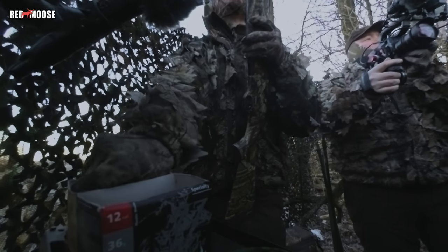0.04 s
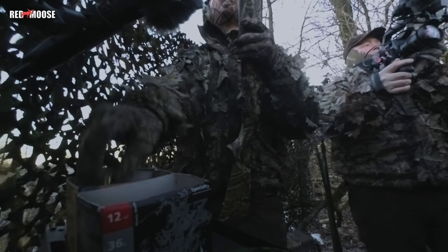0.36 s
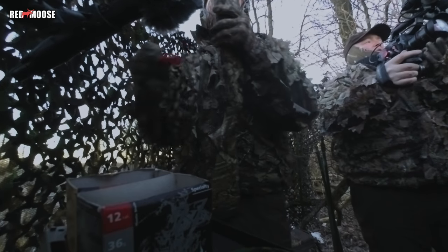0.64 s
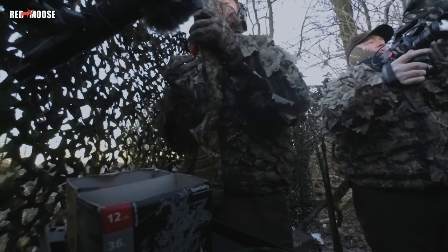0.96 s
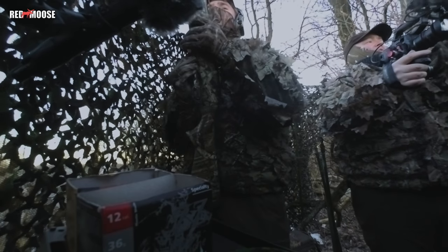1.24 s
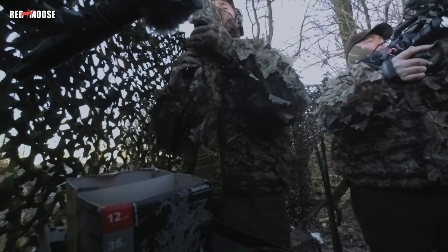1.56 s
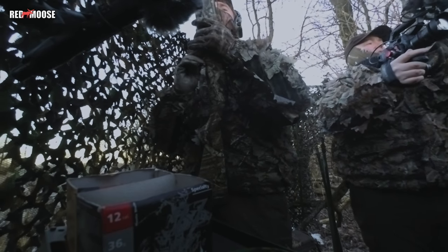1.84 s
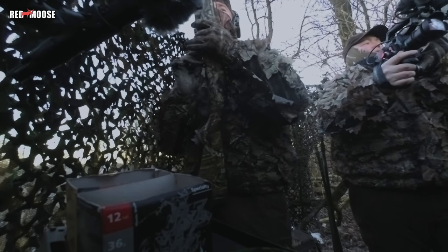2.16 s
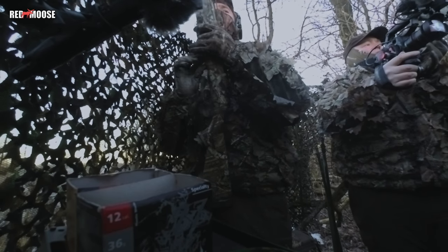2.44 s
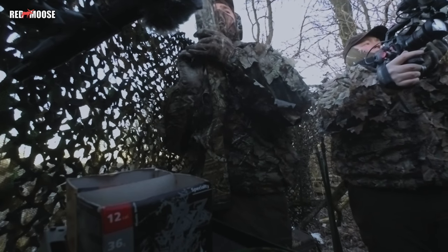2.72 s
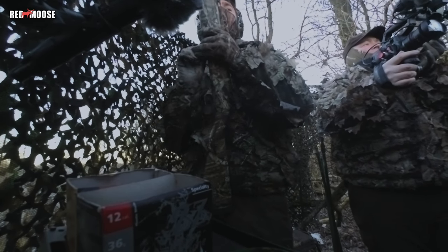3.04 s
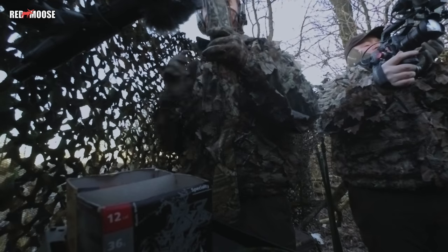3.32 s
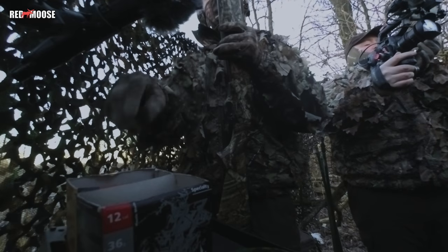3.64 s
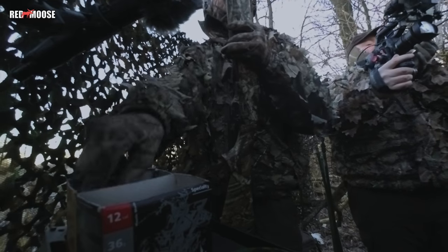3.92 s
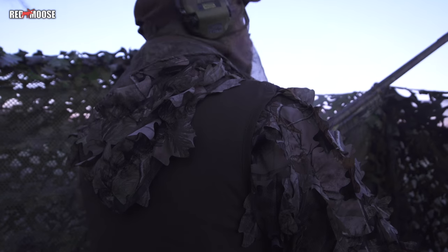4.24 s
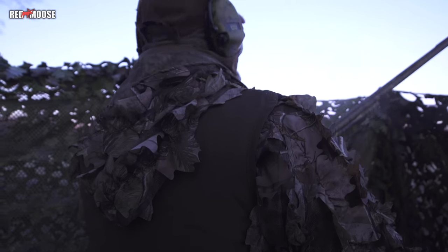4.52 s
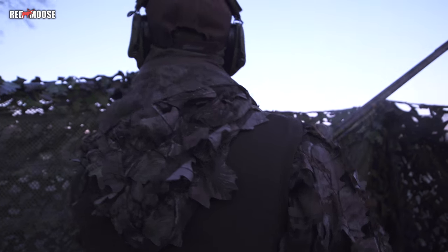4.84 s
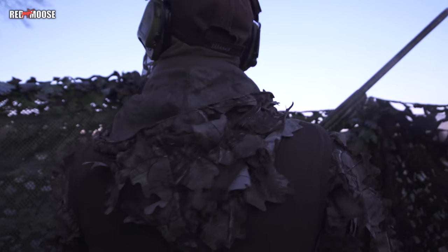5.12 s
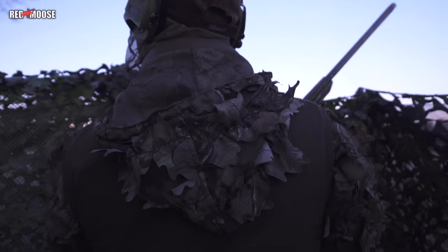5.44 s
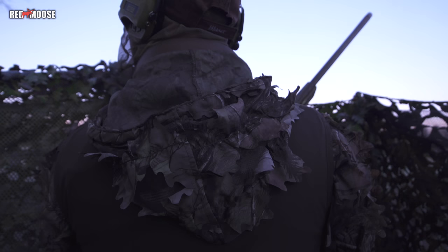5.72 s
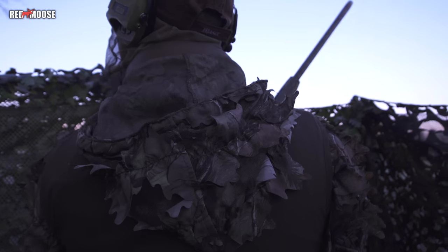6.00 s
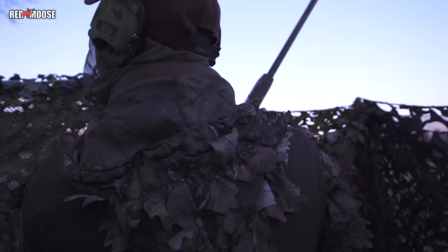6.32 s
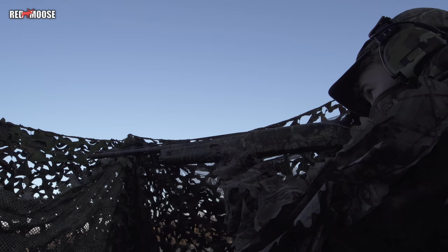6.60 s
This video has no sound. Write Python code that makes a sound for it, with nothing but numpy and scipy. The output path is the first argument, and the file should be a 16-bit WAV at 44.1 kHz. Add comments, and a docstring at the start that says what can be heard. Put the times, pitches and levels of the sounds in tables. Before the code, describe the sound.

A hand knocks softly against a cardboard cartridge box while a leafy camouflage suit rustles and a low rumble swells briefly. Cartridges click and slide into a shotgun, and its steel action snaps twice, the second time louder. Quiet woodland air with a faint hum then gives way to stiller open air, where the gear keeps clicking and tapping lightly. Everything sounds close.

```python
"""A shotgun is loaded in a hunting blind: cartridges click and slide in, and the steel action snaps twice. A
gloved hand bumps the cardboard cartridge box, and a leafy camouflage suit rustles as the arms move. A few low
rumbles swell and die. Behind it all are woodland air and a faint hum; at about four seconds the scene changes,
and the background becomes quieter open air without the hum."""
import sys
import numpy as np
from scipy import signal
from scipy.fft import rfft, irfft
from scipy.io import wavfile

SR = 44100
rng = np.random.default_rng(int(sys.argv[2]) if len(sys.argv) > 2 else 0)


def transcribe(u):
    """Save the signal u as a 16-bit wav file named by the first command-line argument.

    u: samples, shape (n,) or (channels, n), limited to [-1, 1]; the rate is SR.
    q: integer samples, one column per channel.
    """
    v = np.clip(np.atleast_2d(u).T, -1, 1)
    q = np.round(v * 32767).astype(np.int16)
    wavfile.write(sys.argv[1], SR, q)


N = 298116
TIME = np.arange(N) / SR
AGE = TIME[:SR // 8]  # seconds since one short sound began
QUIET_S = 4.12  # when the scene changes to a quieter background


# Ringing tones of the gun's catch and of its breech, where the cartridges go in:
# (pitch [Hz], level relative to the snap [dB], time to fade by 60 dB [s])
CATCH_TONES = [(380, -28, 0.017), (1781, -15, 0.017), (3415, -10, .018), (4020, -9.5, 0.014),
               (4800, -3.5, 0.0084), (5200, 1.5, 0.009), (6080, -9, .018), (7230, -4, 0.0098),
               (8160, -7, .015), (12420, -5.5, 0.0066), (13650, -7.5, .01)]
BREECH_TONES = [(350, -29.5, 0.015), (530, -16, .018), (756, -10, 0.011), (1230, -4, 0.014),
                (1796, -1, .013), (2670, -8.5, 0.01), (4170, -11.5, .011), (4850, -6.5, 0.0067),
                (5410, -11, 0.0086), (6250, -15, 0.008), (8215, -1, 0.005), (13600, -17.5, .01)]

def snap(tones, start_s, level_db, hold_s):
    """Sprung steel slams home: it stays loud for an instant, then rings out, damped by the hands."""
    out = np.zeros(N)
    for hz, db, t60 in tones:
        tone = np.sin(2 * np.pi * (hz * AGE + rng.random()))
        add(out, start_s, undb(level_db + db) * tone * fade(t60, hold_s))
    return out


# Small hard hits of cartridges, gun and gear:
# (time [s], level [dB], decay time [s], centre pitch [Hz], width [octaves], the part's own ring [Hz])
CLICKS = [(.2646, -44, .0027, 12000, 1.9, 8500), (0.41, -46, 0.003, 1600, 1, 1900),
          (.424, -38.5, 0.0075, 1900, 1.24, 1160), (0.474, -37, .0035, 690, 2.36, 1080),
          (.501, -48.5, .004, 1700, 1.7, 1590), (.888, -54, .0026, 3200, 1.5, 3480),
          (1.206, -52.5, .0032, 5340, 0.83, 6420), (1.223, -52, 0.0038, 1470, 1.4, 1440),
          (1.2517, -44, 0.0017, 2400, 1.23, 3000), (1.36, -36, 0.0011, 3740, 1.27, 3700),
          (1.381, -35.5, 0.0029, 2800, 1.6, 4210), (1.3879, -37, 0.0042, 2700, 1.9, 3470),
          (1.425, -39.5, 0.0016, 5400, 3.2, 4550), (1.512, -53, .0018, 2400, 1.6, 4900),
          (1.687, -56.5, .0058, 1200, 2.2, 2050), (2.2589, -37.5, 0.0016, 1600, 1.3, 3520),
          (2.2633, -31.5, 0.0014, 6700, 3.8, 4620), (2.8289, -39.5, 0.001, 3980, 1.47, 4350),
          (2.864, -44, 0.0037, 1200, 2.3, 1170), (2.8695, -22.5, 0.0013, 5800, 2.8, 1408),
          (2.879, -43, .002, 4700, 3.2, 3254), (3.0375, -45, 0.0049, 1290, 1.2, 1200),
          (3.059, -53.5, .0046, 1690, 2, 1400), (3.2776, -45, 0.0043, 1393, 2.27, 1780),
          (4.4151, -42, 0.0054, 2330, 1.47, 1703), (4.437, -47, 0.0024, 1580, 1.2, 1710),
          (4.502, -52, 0.0037, 1880, 2.8, 1600), (4.619, -40, 0.0011, 1680, 1.3, 1740),
          (4.633, -48, .0057, 2400, 1.3, 1730), (4.6423, -45.5, .0021, 3600, 2.2, 4660),
          (4.651, -32, 0.0022, 3250, 2.9, 1676), (4.846, -49.5, .0022, 1480, 2.6, 3300),
          (4.859, -58, 0.0042, 4320, 1.4, 5240), (4.879, -49.5, 0.0056, 2300, 1.4, 3450),
          (4.886, -44, 0.0049, 800, 2.1, 684), (4.9624, -58.5, 0.0038, 1510, 2.4, 1580),
          (5.2043, -63.5, .005, 4500, 1.4, 4350), (5.3514, -54, 0.0041, 4800, 2.2, 5720),
          (5.5445, -49, 0.0035, 3300, 1.37, 4180), (5.6215, -49.5, 0.0049, 3200, 1.3, 4100),
          (5.6354, -31, 0.0049, 3440, 2.63, 1132), (5.6852, -43, 0.0064, 1590, 2.3, 1740),
          (5.8542, -47, 0.0021, 3400, 3.2, 1610), (6.028, -52.5, 0.0054, 2100, 1.3, 1800),
          (6.3233, -48, 0.0021, 3400, 1.94, 1554), (6.4224, -56, .0025, 1907, 1.23, 1860),
          (6.555, -46.5, 0.0021, 990, 2.2, 1410), (6.6538, -52, 0.0029, 2280, 3.6, 1830)]
# The low, middle, high and top ranges of the gear's sound: (from [Hz], to [Hz])
GEAR_BANDS = [(450, 1100), (1150, 2600), (2900, 6300), (6800, 13000)]
# The gun rings along with every click: (pitch [Hz], level relative to the click [dB])
GUN_RINGS = [(1720, -10), (4400, -12.5)]

def clicks(hold=0.31, rise_s=0.0003, scuff_db=-22, scuff_s=0.0035, tail_db=-21, ring_db=-2.5, crack_db=-2):
    """Hard parts graze, then hit: a noisy crack, with the part and the gun ringing above it."""
    times, level_db, decay_s, centre_hz, width, ring_hz = np.transpose(CLICKS)[:, :, None]
    lead = SR // 100  # a faint scuff grows over the 10 ms before each hit
    scuff = undb(scuff_db) * np.exp(-AGE[lead:0:-1] / scuff_s) * np.ones_like(times)
    blow = fade(np.log(1000) * decay_s, hold * decay_s) * (1 - np.exp(-AGE / rise_s))
    loudness = np.hstack([scuff, blow + undb(tail_db) * fade(t60=0.058)])  # one row per click
    crack = rng.standard_normal(loudness.shape) * loudness
    levels = band_levels(level_db + crack_db, centre_hz, width)
    sounds = sum(undb(db) * same_energy(band(crack, edges, order=3))
                 for edges, db in zip(GEAR_BANDS, levels))
    for hz, db in [(ring_hz, ring_db)] + GUN_RINGS:
        ring = np.sin(2 * np.pi * (hz * AGE + rng.random(times.shape))) * blow
        sounds[:, lead:] += undb(level_at(hz, level_db + db, centre_hz, width)) * same_energy(ring)
    out = np.zeros(N)
    for hit_s, sound in zip(times[:, 0], sounds):
        add(out, hit_s - lead / SR, sound)
    return out


# Cartridges, fittings and straps sliding:
# (start [s], end [s], level [dB], centre pitch [Hz], width [octaves])
SLIDES = [(2.576, 2.591, -54.5, 2500, 2.7), (2.666, 2.682, -50, 2000, 2.7), (2.682, 2.752, -43, 2800, 2.04),
          (2.746, 2.771, -38.5, 2320, 1.85), (2.797, 2.821, -48.5, 6500, 2.8),
          (2.842, 2.855, -54, 6000, 2.2), (4.394, 4.41, -57, 1700, 0.98), (4.482, 4.495, -49, 5000, 2.1),
          (4.538, 4.618, -56.5, 2680, 1.7), (4.837, 4.842, -53, 1400, 1.9), (5.374, 5.492, -61, 3570, 1.9),
          (5.68, 5.683, -50.5, 1400, 1.8), (5.84, 5.861, -60, 1400, 2.5), (6.316, 6.321, -58, 2400, 2.3),
          (6.525, 6.553, -52, 1600, 1.47)]
# Pitches that the gun's steel tube strengthens: (pitch [Hz], width [Hz], level [dB])
TUBE_TONES = [(790, 250, -13.5), (1780, 350, 3), (4100, 1500, 5), (8500, 810, 7)]

def slides(edge_s=0.009, judder_db=1.8):
    """Plastic and brass scrape along a steel tube in tiny uneven slips."""
    slips = grains(spread_db=1) * undb(judder_db * wander(200))
    tube = sum(undb(db) * band(slips, (hz - width / 2, hz + width / 2), order=1)
               for hz, width, db in TUBE_TONES)
    bands = np.array([unit(band(slips + tube, edges, order=3)) for edges in GEAR_BANDS])
    out = np.zeros(N)
    for start_s, end_s, *contact in SLIDES:
        pressure = np.clip(np.minimum(AGE, end_s - start_s + edge_s - AGE) / edge_s, 0, 1)
        i = int(start_s * SR)
        scrape = undb(band_levels(*contact)) @ bands[:, i:i + len(AGE)]
        add(out, start_s - edge_s / 2, pressure * scrape)
    return out


# The hand bumps the box: (time [s], level [dB], favoured pitch [Hz], time to fade by 60 dB [s])
BOX_KNOCKS = [(0.206, -33, 670, 0.034), (.371, -26.5, 587, 0.026), (0.4118, -20.5, 580, 0.027),
              (.4243, -19.5, 786, 0.048), (0.4761, -18, 350, 0.034), (.489, -27.5, 340, 0.04),
              (0.502, -26.5, 370, 0.025), (.511, -31.5, 794, 0.031), (3.915, -25, 474, 0.023),
              (3.938, -29.5, 630, 0.022), (4.073, -33.5, 790, .03), (4.106, -33.5, 620, 0.034)]
# Tones of the cardboard panels: (pitch [Hz], level [dB])
PANEL_TONES = [(285, -28), (345, -4), (500, -4), (595, 3), (755, 3), (841, 2.5), (950, 7.5), (1900, -14)]

def box_knocks(reach_octaves=0.14, rise_s=0.00064):
    """Soft blows on cardboard; where each one lands decides which panels ring most."""
    out = np.zeros(N)
    panel_hz, panel_db = np.transpose(PANEL_TONES)
    for start_s, db, favoured_hz, t60 in BOX_KNOCKS:
        share = undb(panel_db) / (1 + (np.log2(panel_hz / favoured_hz) / reach_octaves) ** 2)
        detuned_hz = panel_hz * (1 + 0.01 * rng.standard_normal(len(panel_hz)))
        ring = share @ np.sin(2 * np.pi * np.outer(detuned_hz, AGE)) / np.linalg.norm(share)
        add(out, start_s, undb(db) * ring * fade(t60) * (1 - np.exp(-AGE / rise_s)))
    return out


# Arms and shoulders moving in the suit:
# (peak time [s], rise [s], fall [s], crinkle level [dB], brushing relative to crinkle [dB])
ARM_MOVES = [(.02, 0.11, 0.29, -59.5, -1), (0.201, 0.037, 0.022, -51, 0), (0.373, 0.13, 0.026, -45, 1),
             (.45, 0.03, 0.034, -50, 6), (.68, 0.21, 0.18, -57, -3), (1.03, 0.12, 0.12, -58, -5),
             (1.42, 0.17, 0.16, -61.5, -4), (1.8, 0.14, .05, -66, -8), (2.25, 0.017, .02, -49.5, -8),
             (2.8, 0.13, 0.12, -61.5, -1.5), (3.45, 0.88, 0.16, -64.5, -7), (3.96, 0.13, .12, -59.5, 2.5),
             (4.104, 0.061, .04, -44, 1.5), (4.46, .15, 0.09, -65, -8), (4.607, 0.033, 0.058, -52.5, -9.5),
             (4.93, 0.35, 0.23, -64, -7), (5.43, .05, 0.068, -63, -15), (5.665, .02, 0.057, -59.5, -2),
             (6.02, .1, 0.069, -81, 4), (6.52, 0.19, .12, -71, -4.5)]
# Tone colours of the brushing fabric and the crinkling leaves: (pitch [Hz], level [dB])
BRUSH_COLOUR = [(110, -19.5), (190, -2.5), (300, -3.5), (420, -7.5), (550, 1.5), (800, 0.5), (1100, -5),
                (1800, -21.5)]
CRINKLE_COLOUR = [(600, -15), (1200, -2), (1800, 3.5), (2400, -2), (5000, -4.5), (9000, -6), (11000, -14),
                  (15000, -17.5)]

def leaf_suit(flutter_db=1.8, brush_db=1.5, still_db=-76, tick_db=-17, ticks_per_s=14):
    """Each movement makes the fabric brush dully while its stiff leaves crinkle and now and then tick."""
    brush_gain, crinkle_gain = 0, undb(still_db)
    for *timing, db, rub_db in ARM_MOVES:
        speed = undb(db) * swell(*timing)
        brush_gain = np.hypot(brush_gain, undb(rub_db) * speed)
        crinkle_gain = np.hypot(crinkle_gain, speed)
    fabric = colour(grains(spread_db=1.8), BRUSH_COLOUR)
    leaves = colour(grains(spread_db=2.1), CRINKLE_COLOUR)
    flutter = undb(flutter_db * wander(70))
    tick_starts = 1.0 * (rng.random(N) < ticks_per_s / SR)
    flicks = signal.oaconvolve(tick_starts, fade(t60=0.012))[:N]
    ticks = undb(tick_db) * unit(band(flicks * rng.standard_normal(N), (1500, 12000)))
    return flutter * (undb(brush_db) * brush_gain * fabric + crinkle_gain * (leaves + ticks))


# A microphone mount sways when the box is touched: (peak time [s], rise [s], fall [s], level [dB])
MOUNT_SWAYS = [(.03, 0.24, 0.23, -49), (.45, 0.13, .17, -38), (3.92, .025, 0.065, -42),
               (4.105, 0.042, 0.034, -35)]
# Other short low rumbles: (peak time [s], rise [s], fall [s], level [dB])
RUMBLES = [(4.11, 0.049, .03, -48), (5.67, .11, .045, -46), (5.905, 0.13, 0.065, -47)]
# Tone colours of the sway and of the rumbles: (pitch [Hz], level [dB])
SWAY_COLOUR = [(18, -29), (25, 0.5), (32, 2), (36, -6), (42, -3), (60, -26), (120, -23), (250, -38.5)]
RUMBLE_COLOUR = [(40, -27), (65, 7), (100, 2.5), (150, -3.5), (210, -0.5), (300, -13), (420, -21),
                 (700, -50)]

def rumble(swells, tone_colour):
    """Deep noise swells and dies away, as when the mount wobbles."""
    loudness = sum(undb(db) * swell(*timing) for *timing, db in swells)
    return loudness * colour(rng.standard_normal(N), tone_colour)


def hum(pitch_hz=59.7, waver=0.00493, harmonics_db=(-66.5, -66, -71, -71.5, -75.5, -74.5, -77)):
    """A faint, slightly wavering hum: a low tone plus tones at whole multiples of its pitch."""
    cycles = np.cumsum(pitch_hz * (1 + waver * wander(5))) / SR
    return sum(np.sqrt(2) * undb(db) * np.cos(2 * np.pi * multiple * cycles)
               for multiple, db in enumerate(harmonics_db, start=1))


# Tone colours of woodland air and of stiller open air: (pitch [Hz], level [dB])
WOODLAND_COLOUR = [(25, -4.5), (90, -6.5), (150, -14.5), (330, -14), (1000, -11.5), (1300, -16.5),
                   (1700, -23), (2500, -25), (4500, -29.5), (7000, -29), (15000, -35)]
OPEN_AIR_COLOUR = [(25, -5), (50, -7.5), (80, 3), (140, -13.5), (300, -9), (500, -3.5), (1100, -6),
                   (1600, -5), (2300, -13), (5000, -20), (10000, -21.5), (15000, -24.5)]

def outdoor_air(woodland_db=-58.5, open_db=-64.5, drift_db=-1.4):
    """Woodland air with the hum, then stiller open air; the loudness drifts gently."""
    woodland = hum() + undb(woodland_db) * colour(rng.standard_normal(N), WOODLAND_COLOUR)
    open_air = undb(open_db) * colour(rng.standard_normal(N), OPEN_AIR_COLOUR)
    return np.where(TIME < QUIET_S, woodland, open_air) * undb(drift_db * wander(3))


def echoes(level_db, t60, edges_hz, rise_s=0.0016):
    """The echoes of one sharp click, so many that they blur into fading noise."""
    tail = band(rng.standard_normal(len(AGE)), edges_hz) * fade(t60) * np.minimum(AGE / rise_s, 1)
    return undb(level_db) * tail / np.linalg.norm(tail)


def undb(db):
    """Turn decibels into a number to multiply by."""
    return 10 ** (np.asarray(db) / 20)


def unit(x):
    """Scale to an average (rms) level of 1."""
    return x / np.sqrt(np.mean(x ** 2))


def same_energy(rows):
    """Give each row the energy of a sound of level 1 lasting 10 ms."""
    return rows / np.sqrt(np.sum(rows ** 2, axis=1, keepdims=True) / (SR // 100))


def add(out, start_s, sound):
    """Mix a sound in at its start time."""
    i = int(start_s * SR)
    out[i:i + len(sound)] += sound[:N - i]


def band(x, edges_hz, order=2):
    """Keep the pitches between two edges."""
    return signal.sosfilt(signal.butter(order, edges_hz, "band", fs=SR, output="sos"), x)


def colour(x, points):
    """Shape the bass and treble along a (pitch, level) curve that falls away past its ends; rms 1."""
    hz, db = np.transpose(points)
    log_hz = np.log(np.maximum(np.arange(N // 2 + 1) * SR / N, 1))
    beyond = np.abs(log_hz - np.clip(log_hz, np.log(hz[0]), np.log(hz[-1])))
    curve_db = np.interp(log_hz, np.log(hz), db) - 20 * beyond
    return unit(irfft(rfft(x) * undb(curve_db), N))


def level_at(hz, level_db, centre_hz, width):
    """A contact's level at one pitch: loudest at its centre, 10 dB weaker `width` octaves away."""
    return level_db - 10 * (np.log2(hz / centre_hz) / width) ** 2


def band_levels(*contact):
    """A contact's level in the middle of each of the gear's ranges."""
    return [level_at(np.sqrt(low * high), *contact) for low, high in GEAR_BANDS]


def wander(turns_per_s):
    """A line that drifts at random, about 1 either side of zero."""
    points = rng.standard_normal(SR // 10)
    return unit(np.interp(TIME * turns_per_s, np.arange(len(points)), points))


def grains(spread_db):
    """Rough noise made of tiny slips of unequal size, 16 samples each."""
    noise = rng.standard_normal(N)
    sizes = np.minimum(rng.exponential(size=N // 16 + 1), 5)
    return unit(noise * undb(spread_db * np.repeat(sizes, 16)[:N]))


def fade(t60, hold_s=0):
    """Stay at full level for hold_s, then fall by 60 dB every t60 seconds."""
    return np.exp(-np.log(1000) * np.maximum(AGE - hold_s, 0) / t60)


def swell(peak_s, rise_s, fall_s, roundness=1.47):
    """Build to a peak and die away, sounding only on the peak's side of QUIET_S."""
    away = np.maximum((peak_s - TIME) / rise_s, (TIME - peak_s) / fall_s)
    return np.exp(-away ** roundness) * ((TIME < QUIET_S) == (peak_s < QUIET_S))


def scene(drop_s=6.68, drop_db=-5):
    """The gear and its echoes over the suit, rumbles and air; the level steps down just before the end."""
    gear = clicks()
    gear += snap(CATCH_TONES, start_s=2.2636, level_db=-16, hold_s=0.00091)
    gear += snap(BREECH_TONES, start_s=2.8695, level_db=-13.5, hold_s=0.0032)
    gear += box_knocks() + slides()
    near = echoes(level_db=-20, t60=0.041, edges_hz=(300, 12000))  # off bodies and poles
    far = echoes(level_db=-38, t60=0.35, edges_hz=(400, 7000))  # off the trees
    mix = gear + signal.oaconvolve(gear, near + far)[:N]
    mix += leaf_suit()
    mix += rumble(MOUNT_SWAYS, SWAY_COLOUR) + rumble(RUMBLES, RUMBLE_COLOUR)
    mix += outdoor_air()
    return (mix * undb(drop_db * (TIME > drop_s)))[None]


def record(dry, ceiling=0.8, top_hz=15600):
    """Round off the sharpest peaks and remove the highest treble."""
    rounded = ceiling * np.tanh(dry / ceiling)
    return signal.sosfilt(signal.ellip(8, 0.2, 70, top_hz, fs=SR, output="sos"), rounded)


dry = scene()
out = record(dry)
transcribe(out)
```